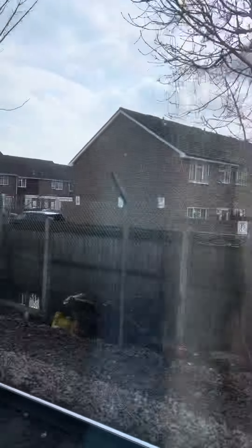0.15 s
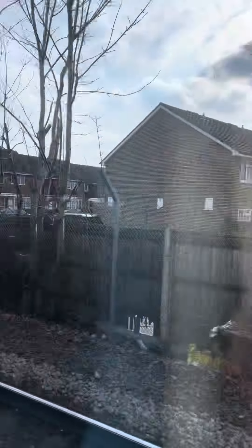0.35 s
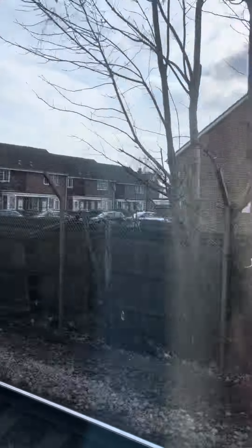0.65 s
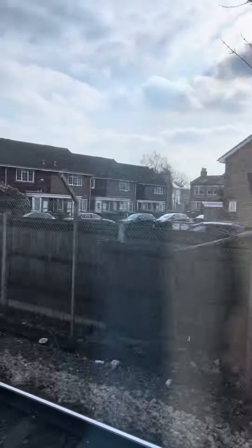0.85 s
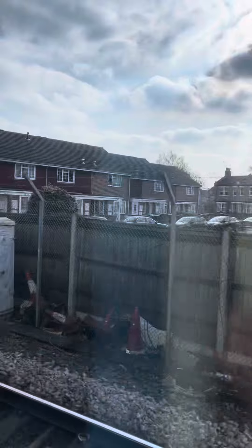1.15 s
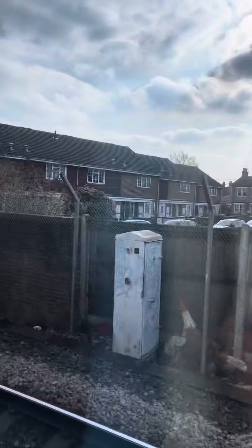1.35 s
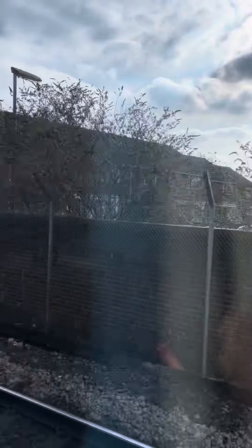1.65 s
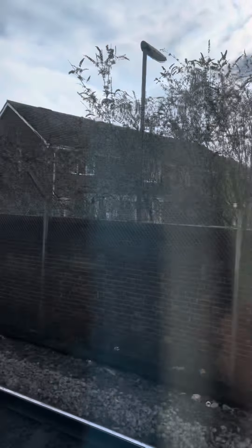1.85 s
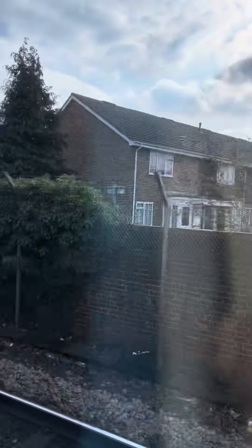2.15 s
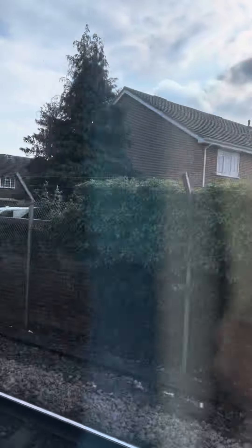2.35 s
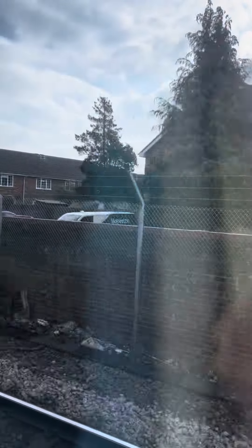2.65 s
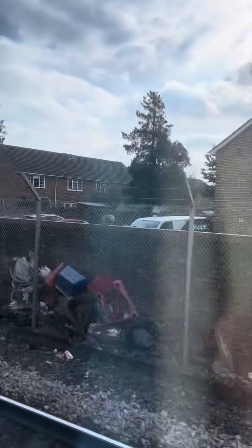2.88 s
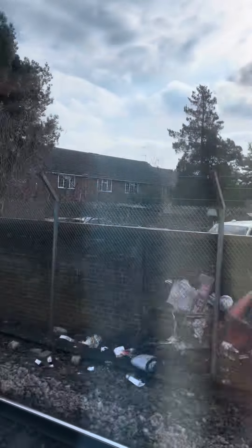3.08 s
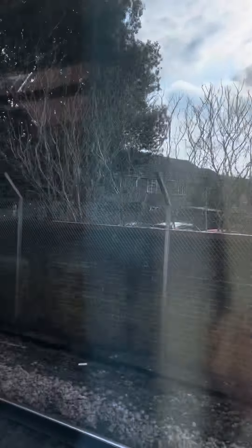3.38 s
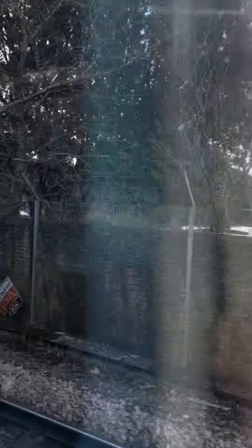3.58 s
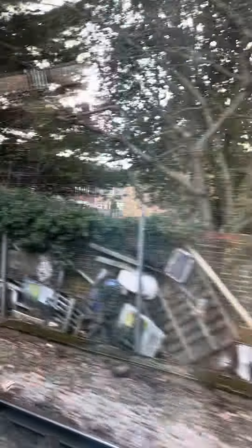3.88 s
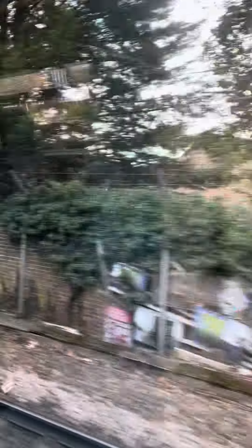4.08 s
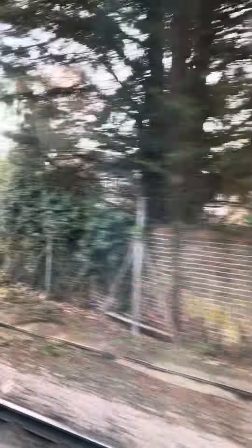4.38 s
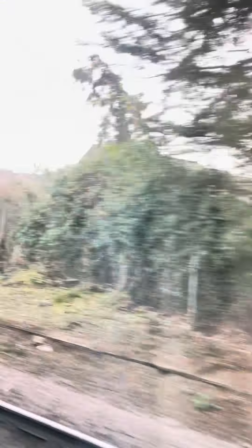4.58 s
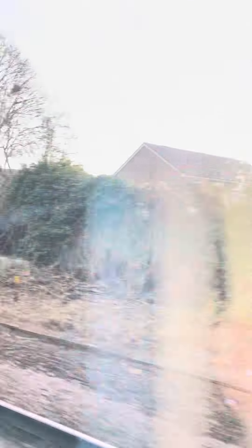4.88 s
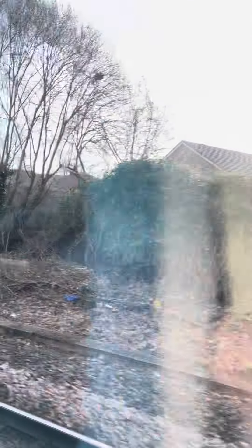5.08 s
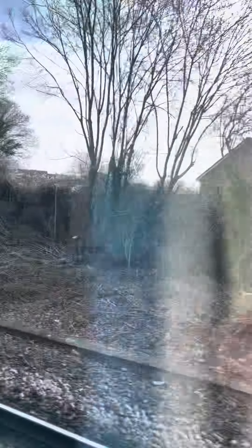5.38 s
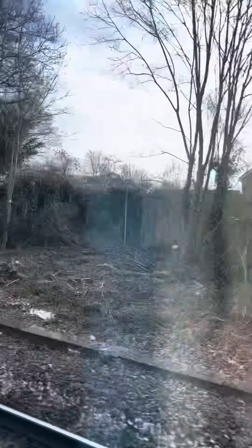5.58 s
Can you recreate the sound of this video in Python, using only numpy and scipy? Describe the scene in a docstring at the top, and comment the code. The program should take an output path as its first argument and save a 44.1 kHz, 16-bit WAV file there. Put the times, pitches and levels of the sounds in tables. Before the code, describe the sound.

A passenger train rolls along with a steady low rumble and roar, heard from a microphone inside the carriage. A deep boom swells and fades over an engine hum and a faint gear whine. The wheels knock dully over rail gaps in two short clusters during the first half. Ventilation hisses very faintly, and a few small clicks sound nearby, the sharpest just before the end.

```python
"""Rolling noise fills a train carriage: wheel and rail roughness drives the floor into rumble and roar.
A body resonance booms, the engine hums, gears whine and the rail rings faintly. Wheels strike rail
gaps and excite the damped floor modes. Ventilation air hisses, loose fittings tinkle and rustle in
short puffs, a thin whistle passes once, and a few small clicks sound close by."""
import numpy as np
from scipy import signal
from scipy.fft import rfft, irfft
from scipy.ndimage import uniform_filter1d
import sys
import numpy as np
from scipy import signal
from scipy.fft import rfft, irfft
from scipy.io import wavfile
from scipy.ndimage import uniform_filter1d

SR = 44100
rng = np.random.default_rng(int(sys.argv[2]) if len(sys.argv) > 2 else 0)


def transcribe(u):
    """Save the signal u as a 16-bit wav file named by the first command-line argument.

    u: samples, shape (n,) or (channels, n), limited to [-1, 1]; the rate is SR.
    q: integer samples, one column per channel.
    """
    v = np.clip(np.atleast_2d(u).T, -1, 1)
    q = np.round(v * 32767).astype(np.int16)
    wavfile.write(sys.argv[1], SR, q)


N = 252693

# Cabin field at two ports, left and right: frequency_hz, side_re_mid_db, coherence, side_phase_rad
PORT_FIELD = [(30, -42, 0.23, 0.19), (97.5, -33, 0.66, 0), (180, -21, 0.3, 0.06), (300, -13, 0.75, 0.55),
              (468, -5, 0.5, 0.43), (640, -2, 0.49, 0.29), (900, 3, 0.21, 0.41), (1210, -0.5, 0.12, 1),
              (1650, -11.5, 0.073, 0.19), (2110, -1.5, 0.07, 0.39), (3470, -2, 0.23, 1.4),
              (5000, 6.5, 0.23, 2), (5500, -2.5, .3, 1.7), (6000, -20.5, .1, 0.18), (7000, -3, .3, 1.5),
              (9100, 19.5, .1, 0.31), (9900, 14, 0.36, 1.5), (10800, 0, .3, 1.7), (11900, -22.5, .1, 0.3)]
# Ventilation spectrum: frequency_hz, relative_density_db
HISS_SPECTRUM = [(820, -13), (1400, -2.5), (1560, -4), (1880, 3), (2300, 0.5), (2890, -7.5), (3710, -8.5),
                 (4890, -22), (5410, -21.5), (6680, -24.5), (8030, -31), (8640, -81), (9300, -44.5),
                 (9740, -70), (10400, -22), (12600, -35), (16400, -51.5), (22000, -120)]
# Ventilation level: time_s, level_db
HISS_LEVEL = [(0, -67), (.8, -65.5), (1.5, -65), (5.73, -65.5)]
# Path of the whistle: time_s, pitch_hz, level_db
WHISTLE_PATH = [(2.08, 11000, -110), (2.14, 11270, -95), (2.22, 11460, -94), (2.45, 11700, -96),
                (2.66, 11600, -101), (2.74, 11400, -92), (2.79, 11220, -95), (2.86, 11200, -110)]
# Rustling puffs: start_s, level_db, rise_s, t60_s, sizzle_db, body_db
PUFFS = [(.31, -87, 0.018, .33, 2, 4), (.65, -84, .02, .4, -0.5, -1), (.8, -83, 0.013, 0.37, 5, 7),
         (1.12, -80, .02, 0.38, 1, 8.5), (1.34, -79.5, 0.019, 0.36, -3, 6),
         (1.43, -73.5, 0.035, 0.38, -0.5, 6), (1.77, -83, 0.013, 0.45, 1, 2), (1.85, -80, .013, 0.25, 4, 6),
         (2.14, -74, .01, 0.56, -5.5, -6), (2.27, -81.5, 0.041, .89, -0.5, 3),
         (2.57, -79.5, 0.0088, .6, 1, 4), (2.805, -78, .012, 0.61, -5, 2.5),
         (3.36, -86.5, 0.029, .25, 11, -1), (3.775, -80, .006, .35, -5.5, -1),
         (4.172, -76.5, 0.0043, .51, -8, -3), (4.25, -91, 0.0092, .16, 10, 0),
         (4.67, -82, 0.021, .26, 3, 0), (4.77, -78.5, 0.012, .56, -3, -2), (4.85, -82.5, .0079, .19, 9, -1),
         (5.1, -74.5, .007, 0.66, -6, 1), (5.16, -88, .03, .5, 9, 3), (5.491, -80, 0.017, 0.99, 3, 0)]
# Treble bands of a puff: centre_hz, width_hz, gain_db
RUSTLE_BANDS = [(2900, 700, -9.5), (3670, 240, -7.5), (4340, 280, -10), (5415, 610, -2.5),
                (5730, 550, -6.5)]
# Sizzle above those bands: centre_hz, width_hz, gain_db
SIZZLE_BANDS = [(7550, 1500, -9.5), (10400, 5300, -6)]
# Clicks: start_s, level_db, focus_hz, falloff_db_per_octave, echo_db, echo_t60_s,
# left_minus_right_db, chatter_s, right_lag_s
CLICKS = [(1.7895, -44, 1050, 11.5, -22, .04, 2, .001, 0),
          (2.562, -58, 5500, 15, -20, .04, -4, .002, .00017), (2.566, -55, 3400, 16, -13, .08, -3, .004, 0),
          (5.4483, -48, 3300, 5, -26, .15, -2, .0006, .00017),
          (5.652, -51, 11000, 10, -16, .4, 1.5, .0015, .00017),
          (5.6532, -32.5, 1600, 8.5, -18, .28, 1.5, .002, .00017),
          (5.663, -41, 2800, 9.5, -15, .1, -5, .003, .00017)]
# Resonances of a click: centre_hz, width_hz, gain_db
CLICK_MODES = [(750, 320, 1), (1050, 720, -3), (1656, 1500, 0), (2400, 850, 0), (3510, 150, -7),
               (5300, 2100, -6.5), (7750, 1800, -4.5), (10700, 3000, 2)]
# Firing hum, two gear tones, rail ring (pitched by RAIL_RING):
# pitch_hz, width_hz, noise_share, left_db, right_db
TONES = [(42.4, 6, 0.45, -1.5, -1.5), (471, 17, 0.55, 1, -4), (566.5, 40, 0.9, -3.5, -9.5),
         (2070, 170, 0.94, -23, -20.5)]
# Engine firing hum: time_s, level_db
HUM_LEVEL = [(0, -39.5), (.35, -45), (.62, -41.5), (1.4, -33.5), (2.28, -33.5), (2.7, -43.5), (3.02, -32),
             (3.65, -41), (4.1, -37.5), (4.55, -33), (4.8, -37.5), (5.15, -34.5), (5.73, -35)]
# Gear whine: time_s, level_db
WHINE_LEVEL = [(0, -50), (.6, -46), (.9, -47), (1.35, -45.5), (1.7, -44.5), (2.1, -44.5), (3.1, -45),
               (3.3, -44), (3.7, -48), (3.85, -45), (4.4, -47), (5.15, -44.5), (5.35, -51), (5.73, -44)]
# Drift of the rail ring: time_s, relative_level_db, pitch_hz
RAIL_RING = [(0, 4, 2090), (.35, 1, 2065), (.6, 5, 2150), (.85, 5, 2113), (1.3, 1.5, 2140),
             (1.9, -3.5, 2038), (2.6, 4.5, 2070), (3.4, -1, 2070), (4.2, 0, 2070), (5.1, -1, 2076),
             (5.73, -1.5, 2050)]
# Wheel blows at rail gaps: start_s, level_db, length_s, thud_db, knock_db, tilt_db_per_octave,
# left_minus_right_db
THUMPS = [(0.618, -42.5, 0.04, 20, 1, -29.5, 1.5), (0.788, -38.5, 0.064, 8.5, 4.5, -1, 0.5),
          (0.977, -37.5, 0.062, -7, 6.5, -1.5, 2.5), (1.116, -40, 0.02, -6, -11, 3.5, -0.5),
          (1.129, -34.5, 0.056, -3.5, 10.5, -1.5, 1.5), (1.156, -38.5, 0.03, 0.5, 1.5, 2, 0),
          (1.192, -44, 0.04, 12.5, 9.5, 0, 1), (1.834, -33, 0.036, 1, 1, -6.5, 2.5),
          (1.856, -35, 0.045, 4, 4.5, -5.5, 1), (1.917, -44, 0.04, 0, 7, -11, 3),
          (2.0, -45, 0.06, 5, 11, 2.5, 4), (2.312, -47, 0.07, 22.5, -1, -12, 1.5)]
# Damped floor and bogie modes, thud first, knock second: centre_hz, width_hz, gain_db
FLOOR_MODES = [(158, 51.4, -2.74), (310.4, 34, -1.5), (413, 64, -4.5), (542, 42, -2.5), (661, 124, -3.5),
               (764, 73, -10.5), (966, 97, -16), (1120, 890, -27), (1506, 260, -26.5), (1756, 230, -23),
               (2095, 73, -29), (2720, 360, -40)]
# Boom of the carriage body: time_s, level_db
BOOM_LEVEL = [(0, -38), (.35, -28.5), (.5, -47.5), (.63, -27.5), (.85, -35), (1.18, -33.5), (1.28, -38),
              (1.65, -26), (1.9, -48), (2.36, -31), (2.56, -42), (2.71, -27.5), (2.85, -34), (3.1, -33.5),
              (3.3, -43.5), (3.52, -28.5), (3.8, -40.5), (4.3, -32), (4.42, -50.5), (4.57, -25.5),
              (4.9, -38), (5.04, -34), (5.2, -36.5), (5.73, -38)]
# Low rumble spectrum: frequency_hz, relative_density_db
RUMBLE_SPECTRUM = [(12, -43.5), (27, -15.5), (35, -4), (50, -5), (66, -0.5), (85, -1.5), (100, -2),
                   (118, -7), (138, 1), (168, -3), (198, -15.5), (222, -9.5), (260, -24), (400, -92.5)]
# Floor roar spectrum: frequency_hz, relative_density_db
ROAR_SPECTRUM = [(120, -20.5), (200, 2), (265, -1.5), (320, 1), (372, -2), (410, -0.5), (460, -1),
                 (515, -8), (570, -4.5), (610, -8.5), (650, -8.5), (700, -16), (790, -19.5), (1120, -28),
                 (1600, -48), (2500, -78.5)]
# Rolling noise levels: time_s, rumble_db, roar_db
ROLLING_LEVELS = [(0, -31.5, -39.5), (.9, -33, -37), (1.3, -32.5, -36.5), (1.7, -32, -38), (2.2, -33, -36),
                  (2.8, -34.5, -38.5), (4, -33.5, -37.5), (4.75, -32.5, -37.5), (5.2, -34.5, -38.5),
                  (5.73, -31, -37.5)]


def gain_of(db):
    """Amplitude grows tenfold for every 20 dB."""
    return 10 ** (np.asarray(db) / 20)


def unit_rms(x):
    """Normalisation to a mean square of 1."""
    return x / np.sqrt(np.mean(x ** 2) + 1e-20)


def over_hz(rows, hz, column=1):
    """Interpolation of a table column on a log-frequency axis."""
    table = np.array(rows)
    return np.interp(np.log(hz + 1), np.log(table[:, 0] + 1), table[:, column])


def over_time(rows, column=1):
    """Linear interpolation of a table column at every sample."""
    table = np.array(rows)
    return np.interp(np.arange(N) / SR, table[:, 0], table[:, column])


def add(mix, start_s, sound, pan_db=0):
    """Superposition of a stereo sound on the mix; positive pan_db favours the left."""
    part = mix[:, round(start_s * SR):][:, :sound.shape[1]]
    part += sound[:, :part.shape[1]] * gain_of([[pan_db / 2], [-pan_db / 2]])


def resonate(x, hz, width_hz):
    """Resonance: two band-pass stages in cascade, about a centre that may move."""
    carrier = np.exp(2j * np.pi * np.cumsum(hz * np.ones(x.shape[-1])) / SR)
    pole = np.exp(-np.pi * width_hz / SR)
    for _ in range(2):
        x = 2 * (carrier * signal.lfilter([1 - pole], [1, -pole], x / carrier)).real
    return x


def steadied(x, floor):
    """Envelope compression: a driven vibration swings more evenly than free noise."""
    envelope = abs(signal.hilbert(x))
    return x / (envelope + floor * envelope.mean())


def at_ports(x, lag_s=.00017):
    """Path difference: sound from the window side reaches the right port later."""
    hz = np.fft.rfftfreq(len(x), 1 / SR)
    return np.array([x, irfft(rfft(x) * np.exp(-2j * np.pi * hz * lag_s), len(x))])


def diffuse_noise(spectrum, patchy_db, flicker_db, size):
    """A diffuse field, partly coherent between the ports, with drifting spectral patches and flicker."""
    frames, hz = 4 * N // size + 5, np.fft.rfftfreq(size, 1 / SR)
    mid_re, mid_im, free_re, free_im, patches = rng.standard_normal((frames, len(hz), 5)).T
    patches = uniform_filter1d(patches, size=size // 100, axis=0)
    patches = unit_rms(uniform_filter1d(patches, size=8, axis=1))
    flicker = np.tanh(unit_rms(uniform_filter1d(rng.standard_normal(frames), size=3)))
    coherence = over_hz(PORT_FIELD, hz, column=2)[:, None]
    phase = over_hz(PORT_FIELD, hz, column=3)[:, None]
    mid = mid_re + 1j * mid_im
    side = coherence * np.exp(1j * phase) * mid + np.sqrt(1 - coherence ** 2) * (free_re + 1j * free_im)
    spectra = np.array([mid, side * gain_of(over_hz(PORT_FIELD, hz))[:, None]])
    spectra *= gain_of(over_hz(spectrum, hz)[:, None] + patchy_db * patches + flicker_db * flicker)
    mid, side = signal.istft(spectra, nperseg=size, noverlap=3 * size // 4)[1][:, :N]
    return np.array([mid + side, mid - side]) / np.sqrt(np.mean(mid ** 2))


def ventilation():
    """Flow noise: air from the ducts makes a broadband hiss."""
    hiss = diffuse_noise(HISS_SPECTRUM, patchy_db=1, flicker_db=1, size=1024)
    return gain_of(over_time(HISS_LEVEL)) * hiss


def loose_fittings(level_db=-91.5, taps_per_s=360, t60_s=.033, modes=12):
    """Free vibration: tiny random taps each ring one of several close treble modes."""
    t, tinkle = np.arange(SR // 20) / SR, np.zeros(N)
    taps = gain_of(3.3 * np.minimum(rng.exponential(1, N), 4)) * (rng.random(N) < taps_per_s / SR)
    struck_mode = rng.integers(0, modes, N)
    envelope = gain_of(-60 * t / t60_s) * np.minimum(t / .002, 1)
    for mode, hz in enumerate(np.linspace(5250, 5870, modes)):
        ring = envelope * np.sin(2 * np.pi * hz * t)
        tinkle += signal.oaconvolve(taps * (struck_mode == mode), ring)[:N]
    return gain_of(level_db) * at_ports(unit_rms(tinkle))


def whistle():
    """Narrowband noise is heard as a pitch: a faint whistle bends up and drops."""
    span = slice(round(WHISTLE_PATH[0][0] * SR), round(WHISTLE_PATH[-1][0] * SR))
    hz, out = over_time(WHISTLE_PATH)[span], np.zeros(N)
    ring = resonate(rng.standard_normal(len(hz)), hz, width_hz=35)
    out[span] = unit_rms(ring) * gain_of(over_time(WHISTLE_PATH, column=2)[span])
    return out


def rustling_puffs(sag_hz=300, sag_s=.06, flutter_db=1, body_below_hz=5000):
    """Exponentially decaying noise: treble bands start bright, sag and flutter under a sizzle."""
    out, t = np.zeros((2, N)), np.arange(SR // 3) / SR
    lift_hz = sag_hz * np.exp(-t / sag_s)
    for start_s, level_db, rise_s, t60_s, sizzle_db, body_db in PUFFS:
        flutter = gain_of(flutter_db * unit_rms(uniform_filter1d(rng.standard_normal(len(t)), size=500)))
        noise, left, right = rng.standard_normal((3, len(t)))
        fizz = at_ports(noise) + 0.24 * np.array([left, right])
        puff = np.zeros((2, len(t)))
        for hz, width_hz, band_db in RUSTLE_BANDS:
            band = unit_rms(resonate(noise, hz + lift_hz, width_hz))
            puff += gain_of(band_db + body_db * (hz < body_below_hz)) * band
        for hz, width_hz, band_db in SIZZLE_BANDS:
            puff += gain_of(band_db + sizzle_db) * unit_rms(resonate(fizz, hz, width_hz))
        envelope = (1 - np.exp(-t / rise_s)) ** 2 * gain_of(-60 * t / t60_s)
        add(out, start_s, gain_of(level_db) * flutter * envelope / envelope.max() * puff)
    return out


def clicks():
    """Impulse response: a snap rings the same resonances as its short echo off window and seats."""
    out, t = np.zeros((2, N)), np.arange(SR // 4) / SR
    for start_s, level_db, focus_hz, falloff, echo_db, t60_s, pan_db, chatter_s, lag_s in CLICKS:
        noise, click = rng.standard_normal((3, len(t))), np.zeros((2, len(t)))
        strike = (t == 0) + .35 * noise[0] * np.exp(-t / chatter_s)  # one blow, then chatter
        echo = (1 - np.exp(-t / 0.0036)) * gain_of(echo_db - 60 * t / t60_s)
        for hz, width_hz, mode_db in CLICK_MODES:
            near, left, right = unit_rms(resonate(noise, hz, width_hz))
            snap = resonate(strike, hz, width_hz)
            coherent = at_ports(snap / abs(snap).max() + 0.96 * echo * near, lag_s)
            diffuse = 1.3 * echo * np.array([left, right])
            colour_db = mode_db - falloff * abs(np.log2(hz / focus_hz))
            click += gain_of(level_db + colour_db) * (coherent + diffuse)
        add(out, start_s, click, pan_db)
    return out


def engine_and_rail(wander_share=.008, ring_db=-49):
    """Frequency modulation: firing hum, gear whine and rail ring, each sine plus noise, wander as one."""
    out, t = np.zeros((2, N)), np.arange(N) / SR
    wander_hz, phase = np.geomspace(.5, 6, num=16)[:, None], rng.random((16, 1))
    wander = 1 + wander_share * unit_rms(np.sin(2 * np.pi * (wander_hz * t + phase)).sum(axis=0))
    whine_db = over_time(WHINE_LEVEL)
    levels_db = [over_time(HUM_LEVEL), whine_db, whine_db, ring_db + over_time(RAIL_RING)]
    for row, (hz, width_hz, noise_share, left_db, right_db) in enumerate(TONES):
        pitch_hz = wander * (over_time(RAIL_RING, column=2) if row == 3 else hz)
        band = unit_rms(steadied(resonate(rng.standard_normal(N), pitch_hz, width_hz), floor=1.4))
        sine = np.sin(2 * np.pi * (np.cumsum(pitch_hz) / SR + rng.random()))
        tone = unit_rms((1 - noise_share) * sine + noise_share * band)
        out += gain_of([[left_db], [right_db]]) * tone * gain_of(levels_db[row])
    return out


def wheel_thumps():
    """Impact excitation: a wheel at a rail gap sends a rough judder through the damped floor modes."""
    out, t = np.zeros((2, N)), np.arange(SR // 3) / SR
    floor_lowpass = signal.butter(4, 3200, fs=SR, output="sos")
    for start_s, level_db, length_s, thud_db, knock_db, tilt, pan_db in THUMPS:
        judder, thump = rng.standard_normal((2, len(t))), np.zeros((2, len(t)))
        decay = np.exp(-(t / length_s) ** 3) + 0.12 * np.exp(-t / 0.049)  # blow, then the cabin rings on
        envelope = (1 - np.exp(-t / 0.0058)) * decay
        for mode, (hz, width_hz, mode_db) in enumerate(FLOOR_MODES):
            spread = min((hz / 620) ** 2.6, 1)  # short waves differ between the ports
            ring = envelope * steadied(resonate(judder, hz, width_hz), floor=0.17)
            mid, side = ring / np.linalg.norm(ring, axis=1, keepdims=True) * np.linalg.norm(envelope)
            colour_db = thud_db if mode == 0 else knock_db if mode == 1 else tilt * np.log2(hz / 550)
            thump += gain_of(mode_db + colour_db) * np.array([mid + spread * side, mid - spread * side])
        add(out, start_s, gain_of(level_db) * signal.sosfilt(floor_lowpass, thump), pan_db)
    return out


def body_boom(start_hz=63.3, climb_hz_per_s=1.64):
    """Forced resonance: track roughness drives a narrow, slowly rising boom, alike at both ports."""
    hz = start_hz + climb_hz_per_s * np.arange(N) / SR
    ring = resonate(rng.standard_normal(N), hz, width_hz=11.3)
    envelope = np.sqrt(uniform_filter1d(ring ** 2, size=6000))
    steady_ring = unit_rms(ring / (envelope + 0.22 * envelope.mean()))
    return gain_of(over_time(BOOM_LEVEL)) * steady_ring


def rolling_noise():
    """Structure-borne sound: wheel and rail roughness comes through the floor as rumble and roar."""
    rumble = diffuse_noise(RUMBLE_SPECTRUM, patchy_db=0.52, flicker_db=0.089, size=8192)
    roar = diffuse_noise(ROAR_SPECTRUM, patchy_db=1.2, flicker_db=0.75, size=2048)
    rumble_db, roar_db = over_time(ROLLING_LEVELS), over_time(ROLLING_LEVELS, column=2)
    return gain_of(rumble_db) * rumble + gain_of(roar_db) * roar


def scene():
    """Superposition: the pressures of all sources in the carriage add."""
    drone = rolling_noise() + body_boom() + engine_and_rail() + ventilation()
    return drone + wheel_thumps() + rustling_puffs() + loose_fittings() + clicks() + whistle()


def record(dry):
    """Band limiting: a linear-phase low-pass removes the treble above 12.5 kHz."""
    lowpass = signal.firwin(511, 12500, window=("kaiser", 9), fs=SR)
    return signal.oaconvolve(dry, lowpass[None], "same", axes=1)


dry = scene()
out = record(dry)
transcribe(out)
```